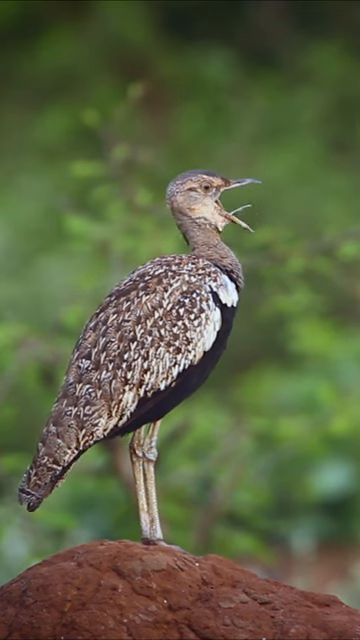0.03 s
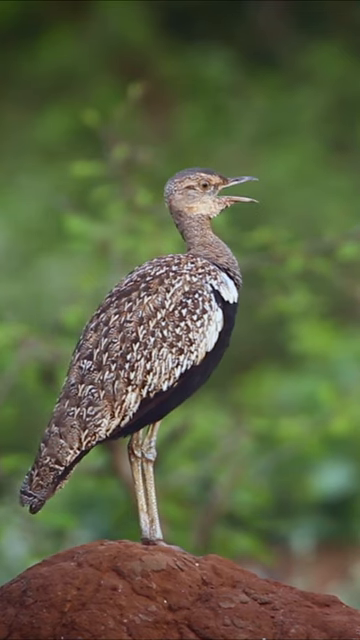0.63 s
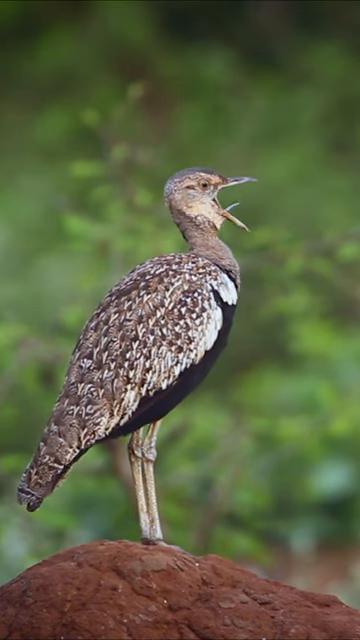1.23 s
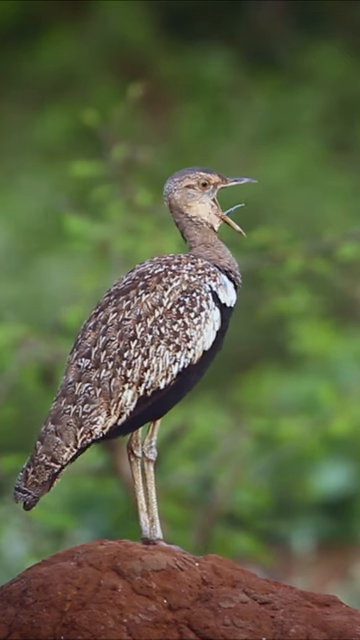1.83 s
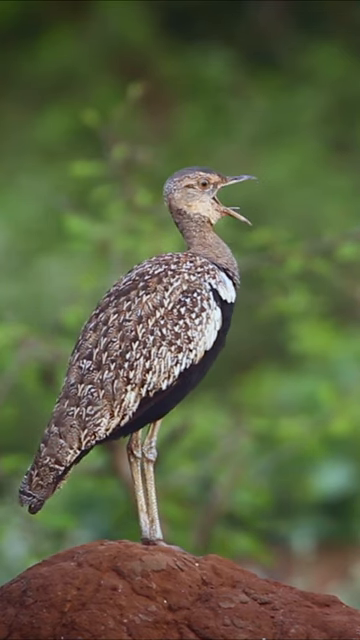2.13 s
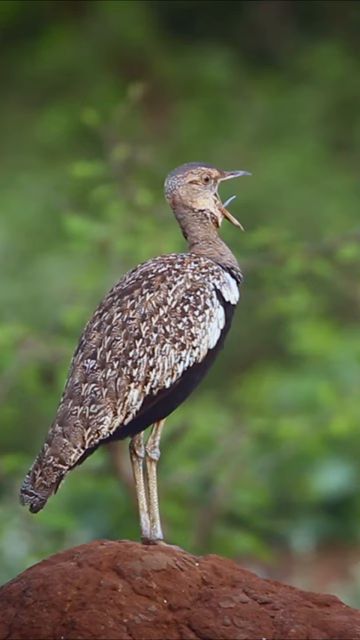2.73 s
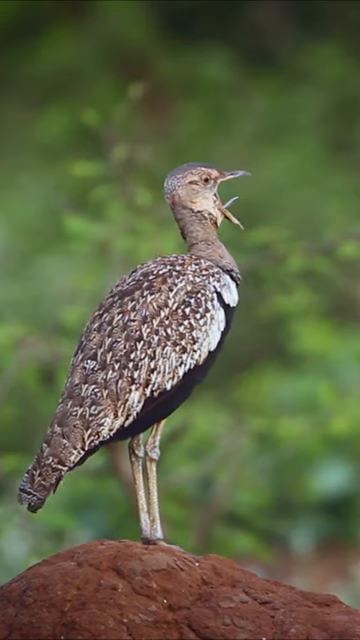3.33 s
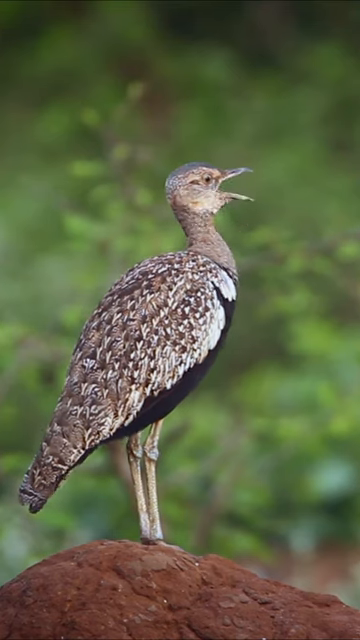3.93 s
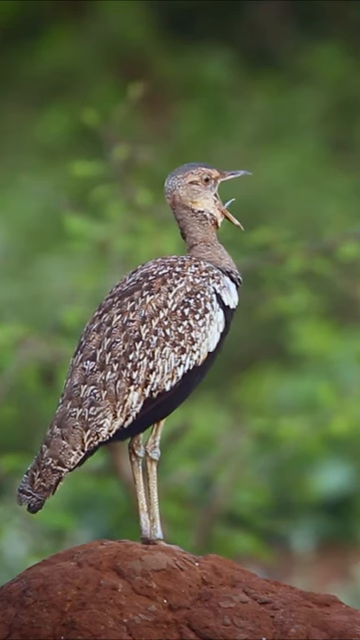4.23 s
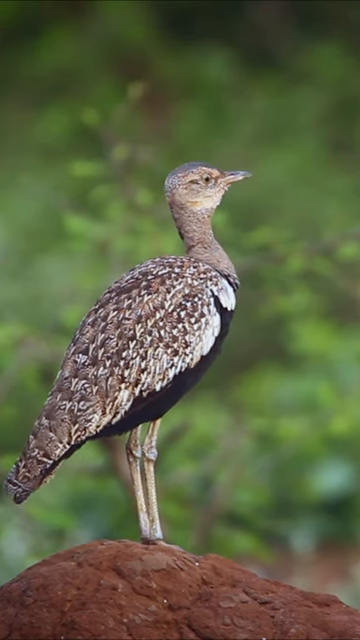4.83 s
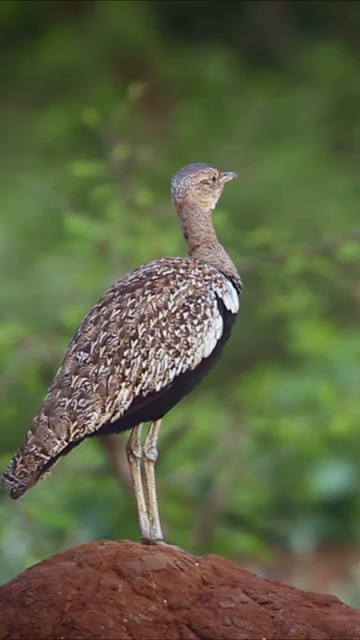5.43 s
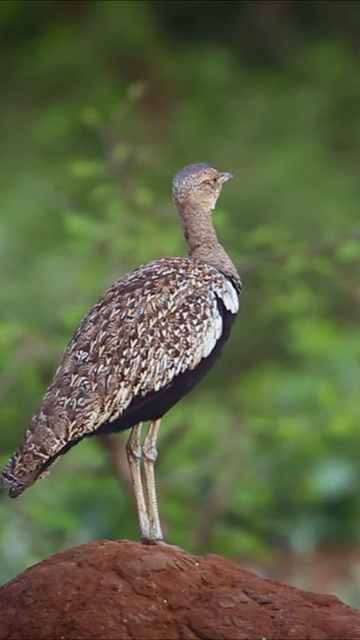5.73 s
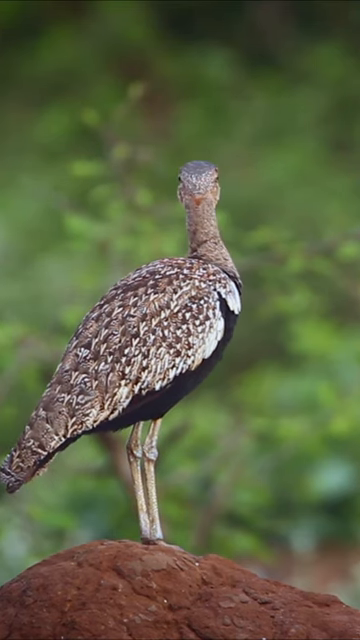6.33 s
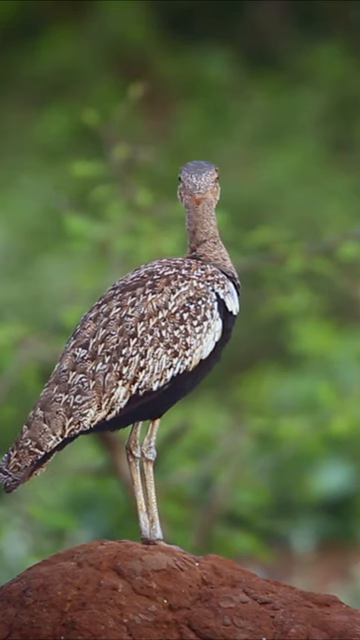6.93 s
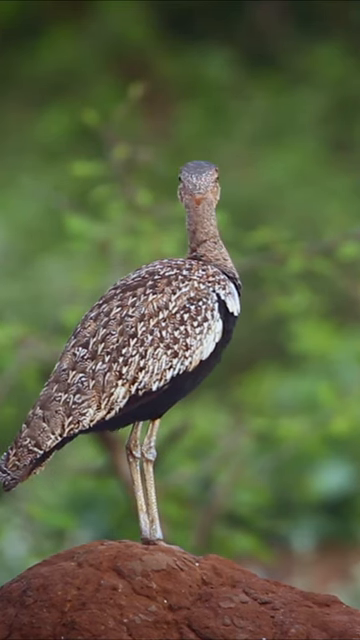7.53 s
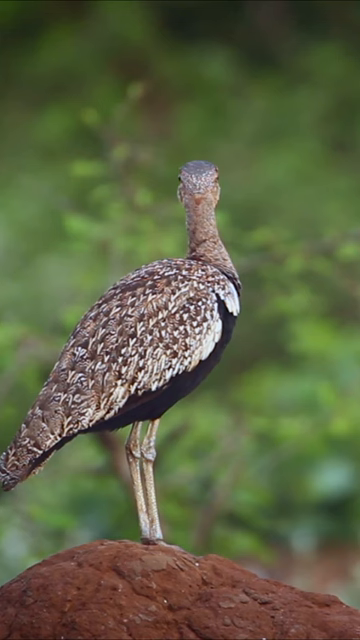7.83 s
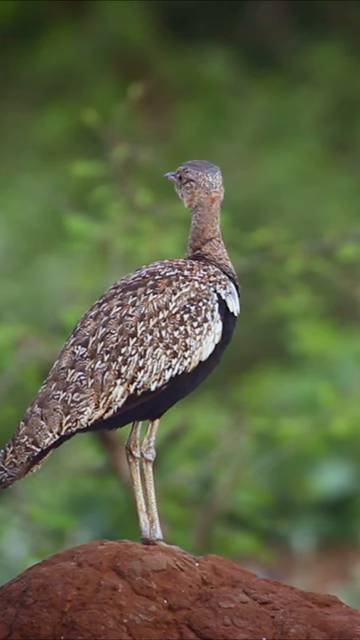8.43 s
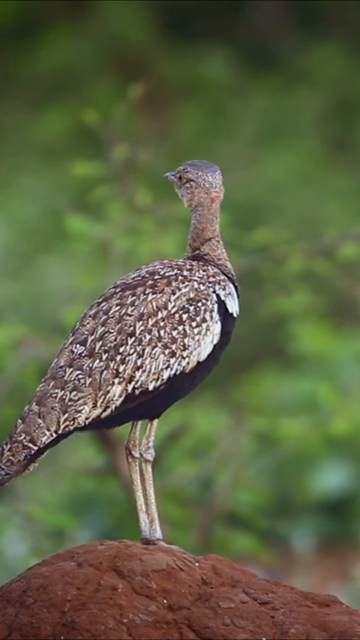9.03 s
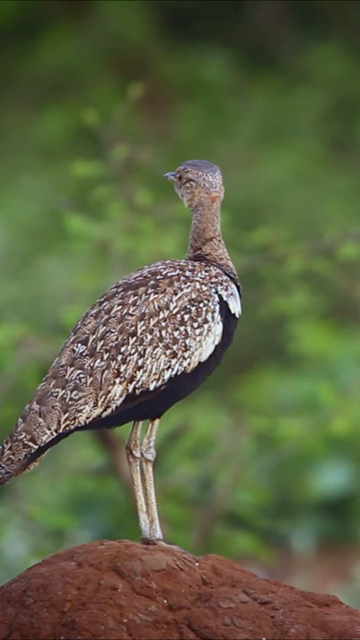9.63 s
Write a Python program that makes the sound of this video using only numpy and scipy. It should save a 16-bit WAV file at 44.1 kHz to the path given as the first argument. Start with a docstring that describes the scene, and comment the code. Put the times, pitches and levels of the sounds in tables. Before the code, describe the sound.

A bird close by gives dry clicks and piercing, downward piping whistles, about two a second, the pipes soon coming in loud and softer pairs. They ring briefly through the scrub and distort the microphone a little. When the run ends, small birds far away carry on with a quick twitter, thin rasps and soft peeps, over faint wind rumble, stirring leaves and hiss.

```python
"""In the bush, a bustard calls from a rock: a dry tongue click rings its mouth cavity, then its syrinx
sounds a loud falling pipe, soon doubled by a shorter one. The pipes scatter back from the scrub and
overload the microphone, which adds gritty overtones. Far off, small birds whistle and chip (gliding
tones) and rasp and squawk (bursts of coloured noise), over a faint breeze and a steady hiss."""
import sys
import numpy as np
from scipy import signal
from scipy.fft import rfft, irfft, next_fast_len
from scipy.io import wavfile
from scipy.ndimage import map_coordinates

SR = 44100
rng = np.random.default_rng(int(sys.argv[2]) if len(sys.argv) > 2 else 0)


def store_pcm(level_fs):
    """Save levels as 16-bit WAV."""
    pcm = np.round(np.clip(level_fs, -1, 1) * 32767).astype(np.int16)
    wavfile.write(sys.argv[1], SR, np.atleast_2d(pcm).T)


N = 426447


def bustard_pipes():
    """Self-sustained oscillation of the syrinx: falling pipes that sink and lengthen through the bout."""
    # Main pipes. Each row: start in seconds, level in dB, closing flick in dB relative to that level.
    pipes = [(.103, -4, -37.5), (.534, -0.73, -34), (0.963, -1.36, -24.5), (1.425, -0.5, -25),
             (1.885, 0.5, -9), (2.341, 0, -13), (2.798, 0, -10), (3.257, -.5, -12), (3.716, -.5, -10),
             (4.184, -.5, -10.5)]
    # Shorter pipes that follow. Each row: start in seconds, level in dB.
    after_pipes = [(1.104, -11), (1.572, -7.5), (2.033, -4.5), (2.493, -6), (2.950, -5), (3.409, -5),
                   (3.873, -5.5), (4.349, -6)]
    # The course of each kind of pipe. Each row: share of its length, pitch ratio, relative level in dB.
    pipe_shape = [(0, 1.165, -6), (.06, 1.12, -3.5), (.14, 1.08, -2), (.32, 1.032, -.7), (.5, 1, -.3),
                  (.72, .968, -3), (.85, .94, -5), (.95, .878, -12.5)]
    after_shape = [(0, 1.13, -27.5), (.2, 1.062, -7.5), (.42, 1.015, 1), (.78, .948, -2), (.97, .892, -11),
                   (1.15, .875, -28)]
    waver, rasp_rad = .004, .025
    out = np.zeros(N)
    for s, db, flick_db in pipes:
        length, hz = .08 + .0116 * s, 2538.2 - 12.8 * s
        hook = np.interp(flick_db, [-28, -12], [.87, 1])  # a stronger flick hooks the pitch higher
        flick = [(1.02, hook, flick_db), (1.07, hook, flick_db - 7.5)]
        pipe = syrinx(pipe_shape + flick, length, hz, waver, rasp_rad * amp(db), overtone=.022)
        pressure = np.minimum(np.arange(len(pipe)) / SR / .04, 1)  # the bird's air builds over 40 ms
        add(out, s, amp(db) * outdoors(pressure * pipe, near_db=-20, far_db=-30.5))
    for s, db in after_pipes:
        length, hz = .042 + .01 * s, 2597 - 35.1 * s
        pipe = syrinx(after_shape, length, hz, waver, 1.9 * rasp_rad * amp(db), overtone=.008)
        add(out, s, amp(db) * outdoors(pipe, near_db=-19.5, far_db=-27.5))
    return out


def syrinx(shape, length, hz, waver, rasp=0, overtone=0):
    """Frequency modulation: a glide, roughened mid-note by phase jitter; a third harmonic as it dies."""
    share, ratio, db = np.transpose(shape)
    u = share[-1] * progress(length * share[-1])
    pitch = hz * np.interp(u, share, ratio) * (1 + waver * wobble(300, len(u)))
    jitter = rasp * np.exp(-((u - .39) / .17) ** 2) * wobble(2200, len(u))
    phase = 2 * np.pi * np.cumsum(pitch) / SR + jitter
    dying = np.exp(-((u - .93) / .06) ** 2)
    envelope = signal.windows.tukey(len(u), .1) * amp(np.interp(u, share, db))
    return envelope * (np.sin(phase) + overtone * dying * np.sin(3 * phase))


def bustard_clicks():
    """Impulse excitation: the tongue snaps free and rings the damped modes of mouth, throat and bill."""
    # One click ahead of each main pipe but the first. Each entry: start in seconds.
    clicks = [.420, .854, 1.333, 1.798, 2.259, 2.718, 3.179, 3.642, 4.113]
    # Throat and bill modes. Each row: frequency in Hz, relative level in dB, 60 dB decay in seconds.
    throat_modes = [(400, -17, .022), (930, -16, .012), (1300, -18, .01), (1850, -16, .012),
                    (3850, -20, .008), (4570, -27, .01), (6050, -28, .008), (7000, -30, .008)]
    mouth_hz, fade_db_per_s = 2560, 2
    out, t = np.zeros(N), progress(.98)[:SR // 16]
    attack, decay = 1 - np.exp(-t / .0004), amp(-60 * t / .012)
    mouth = 1.8 * attack * decay * np.sin(2 * np.pi * mouth_hz * t)
    for s in clicks:
        throat = np.zeros(len(t))
        for hz, db, t60 in throat_modes:
            ring = amp(db + rng.normal(0, 2.017) - 60 * t / t60)
            throat += ring * np.sin(2 * np.pi * hz * rng.normal(1, .033) * t)
        burst = amp(-22) * decay * rng.standard_normal(len(t))
        snap = signal.lfilter([.3], [1, -.7], burst)  # one-pole low-pass
        click = outdoors(mouth + throat + snap, near_db=-19, far_db=-22)
        add(out, s, amp(-14 - fade_db_per_s * s) * click)
    return out


def outdoors(x, near_db, far_db):
    """Reverberation: the direct sound, the quick answer of near bushes and the long one of far trees."""
    bushes = amp(near_db) * scrub(x, t60=.16, delay=.013)
    trees = amp(far_db) * scrub(x, t60=.79, delay=.043)
    return np.pad(x, (0, SR - 1)) + bushes + trees


def scrub(x, t60, delay):
    """Diffuse scattering: leaves and branches return a delayed echo that decays exponentially."""
    t = np.arange(SR) / SR
    tail = rng.standard_normal(SR) * amp(-60 * t / t60) * np.clip(t / delay - 1, 0, 1)
    return signal.fftconvolve(x, tail / np.linalg.norm(tail))


def far_whistlers():
    """Scattering and absorption: small birds echo among trees whose foliage soaks up the treble."""
    twitter = far_twitter()
    direct = amp(2.5) * far_slurs() + twitter
    leaves = amp(-6) * scrub(twitter, t60=.028, delay=.002)[:N]  # these birds sit deep inside a bush
    echo = scrub(direct, t60=.6, delay=.012)[:N]
    trees = filtered(echo, lambda hz: 1 / (1 + (hz / 4500) ** 4))
    return direct + leaves + amp(-10.5) * trees


def far_twitter():
    """Pulse trains of brief syrinx tones: a quickening run of chips, and later a soft, uneven trill."""
    # A V-shaped chip and a rising trill note. Each row: share of length, pitch ratio, level in dB.
    chip_shape = [(0, 1.1, -12), (.16, 1, 2.5), (.34, .75, -18), (.6, .73, -11), (.8, 1, -0.5),
                  (1, 1.28, -17)]
    trill_shape = [(0, 0.73, -4), (.3, 0.89, -5), (.5, 0.995, -7), (.75, 1.17, 3.5), (1, 1.27, -6)]
    first_gap_s, shortest_gap_s, quickening = .096, .035, .545
    out, s = np.zeros(N), 3.998
    for k in range(8):
        db = -28.5 - 1.66 * abs(k - 1)  # the second chip is the loudest
        add(out, s, amp(db) * syrinx(chip_shape, length=.018, hz=4900, waver=.011))
        s += shortest_gap_s + (first_gap_s - shortest_gap_s) * quickening ** k
    for beat in 6.197 + .036 * np.arange(9):
        s, db = rng.normal(beat, .0037), rng.normal(-47, 2)
        add(out, s, amp(db) * syrinx(trill_shape, length=.012, hz=2543, waver=.025))
    return out


def far_slurs():
    """Frequency sweeps: several small birds each slur a nearly pure tone along a contour of their own."""
    # Clear falls, low hoots, drooping whistles and faint, gently arched whistles.
    # Each row: start in seconds, length in seconds, middle pitch in Hz, relative level in dB.
    falls = [(.902, .16, 5840, -59), (1.22, 0.16, 5900, -63.5), (1.543, .15, 5900, -52),
             (1.871, .19, 5700, -52.5), (2.23, 0.17, 5630, -60), (3.179, .13, 4850, -41.5),
             (3.448, .15, 4980, -39.5), (3.719, .16, 5033, -42), (3.85, .17, 5660, -55),
             (5.58, .11, 5300, -58.5), (6.458, 0.16, 5630, -57), (9.018, .12, 4560, -48)]
    hoots = [(.872, .07, 1020, -49.5), (1.18, .085, 1000, -48), (1.863, .13, 860, -46.5),
             (2.9, .14, 845, -51.5)]
    droops = [(8.084, 0.23, 1974, -59), (8.808, 0.34, 2120, -62), (8.954, 0.037, 3030, -42.5),
              (9.193, .044, 3340, -56), (9.34, 0.076, 1670, -54.5)]
    arched_whistles = [(2.467, .13, 3990, -53.5), (7.791, 0.066, 2080, -59), (9.56, 0.095, 1588, -57)]
    # Arched peeps. Each row: start in seconds, middle pitch in Hz, relative level in dB.
    peeps = [(6.902, 2825, -51), (7.1, 2875, -49), (7.307, 2780, -46), (9.325, 2935, -44),
             (9.518, 2820, -45.5)]
    # Soft phrases, a fall and then an up-slur. Each row: start and length of the fall in seconds.
    phrases = [(7.633, 0.098), (8.0, 0.091), (8.328, .105)]
    # Thin, broken notes near one pitch. Each row: start and length in seconds.
    chatter = [(4.575, .11), (5.26, 0.12), (6.65, .07)]
    # Each glide: start pitch and end pitch as ratios to the middle pitch.
    fall, hoot, droop, shallow_arch = (1.14, .77), (1.3, .98), (1.02, .88), (.94, .95)
    arch, upslur, flat = (.92, .94), (.75, 1.39), (.97, .94)
    faint_falls_per_s = 1.5
    out = np.zeros(N)
    for notes, glide in (falls, fall), (hoots, hoot), (droops, droop), (arched_whistles, shallow_arch):
        for s, length, hz, db in notes:
            add(out, s, amp(db) * whistle(length, hz, glide))
    for s, hz, db in peeps:
        add(out, s - .036, amp(db - 5) * whistle(length=.02, hz=4240, glide=upslur))  # quick lead-in
        add(out, s, amp(db) * whistle(length=.11, hz=hz, glide=arch))
    for s, length in phrases:
        add(out, s, amp(-56.5) * whistle(length, hz=3900, glide=fall))
        add(out, s + length, amp(-56.5) * whistle(length=.039, hz=3480, glide=upslur))
    for s, length in chatter:
        add(out, s, amp(-56) * whistle(length, hz=4535, glide=flat, flutter_db=7.5))
    for when, height in rng.random((int(faint_falls_per_s * N / SR), 2)):  # birds farther off
        hz = 4360 * 2 ** ((height - .5) * 1.4)  # spread over 1.4 octaves
        add(out, when * N / SR, amp(-64) * whistle(length=.15, hz=hz, glide=fall))
    return out


def whistle(length, hz, glide, flutter_db=2.5):
    """Frequency and amplitude modulation: a wavering, fluttering tone on a parabolic glide."""
    u = progress(length)
    parabola = np.polyfit([0, .5, 1], [glide[0], 1, glide[1]], 2)
    waver_hz = 27 * wobble(200, len(u))
    pitch = hz * np.polyval(parabola, u) + waver_hz
    swell = signal.windows.tukey(len(u), .35) * amp(flutter_db * wobble(70, len(u)))
    return swell * np.sin(2 * np.pi * np.cumsum(pitch) / SR)


def far_raspers():
    """Formants: spectral peaks set thin, high rasps apart from lower, harsh squawks."""
    # The calls. Each row: start in seconds, length in seconds, relative closing level in dB.
    rasp_calls = [(4.73, .24, -50), (5.1, .2, -50.5), (5.43, 0.17, -52.5), (5.69, 0.15, -51.5),
                  (5.92, .12, -50.5), (7.6, .05, -58.5), (7.84, 0.039, -55), (8.05, 0.045, -48.5),
                  (8.37, .05, -54.5), (8.71, 0.051, -55)]
    squawk_calls = [(.87, 0.1, -48), (1.19, 0.134, -46), (1.5, .15, -49.5), (1.73, 0.13, -50.5),
                    (2.17, 0.091, -47)]
    # Their spectra. Each row: frequency in Hz, relative level in dB.
    rasp_colour = [(2500, -17), (3700, -8), (4500, 4.5), (5100, -10), (5800, -1.5), (6300, -1), (7100, -1),
                   (8200, -17), (10500, -31)]
    squawk_colour = [(600, -32), (1150, 5), (1400, -6), (1650, -8.5), (2000, -5), (3400, 2.5), (4200, -24),
                     (7000, -35.5)]
    rasps = harsh_calls(rasp_calls, rasp_colour, rough_db=1, fade_db=7)
    squawks = harsh_calls(squawk_calls, squawk_colour, rough_db=3, fade_db=5)
    return amp(-6.5) * rasps + amp(-1.5) * squawks


def harsh_calls(calls, colour, rough_db, fade_db):
    """Amplitude-modulated noise: toneless, fluttering calls start quickly and fade into their echo."""
    envelope = np.zeros(N)
    for s, length, db in calls:
        u = progress(length)
        course_db = db + fade_db * (1 - u) + rough_db * wobble(200, len(u))
        add(envelope, s, signal.windows.tukey(len(u), .4) * amp(course_db))
    noise = filtered(rng.standard_normal(N), lambda hz: amp(along(colour, hz)))
    voice = envelope * unit(noise)
    return voice + amp(-11.5) * scrub(voice, t60=.18, delay=.012)[:N]


def breeze():
    """Flow noise: a light breeze rumbles on the microphone and stirs the foliage, over steady hiss."""
    # Puffs at the microphone. Each row: peak time in seconds, level over the steady rumble in dB.
    gusts = [(.56, 12), (2.2, 3.5), (3.2, 1.5), (4.9, 3), (9.7, 5)]
    # The stirring of the foliage. Each row: time in seconds, relative level in dB.
    stirring = [(0, -53), (.52, -52.5), (2.2, -51), (4.3, -53.5), (4.9, -51), (7.2, -53), (8.2, -54.5),
                (9.67, -53)]
    # Spectra of the three noises. Each row: frequency in Hz, relative level in dB.
    rumble_colour = [(12, -21), (25, -5.5), (45, -1.5), (100, -2.5), (200, -10), (400, -27), (800, -57.5)]
    foliage_colour = [(100, -5), (250, 1.5), (500, -0.5), (1000, -2.5), (2000, -7.5), (4000, -9),
                      (8000, -21.5), (16000, -41.5)]
    hiss_colour = [(500, -16), (3000, -5.5), (6000, -2.5), (10000, -2), (16000, -3.5)]
    t, gust_width_s = np.arange(N) / SR, .34
    gust_db = sum(db * np.exp(-((t - s) / gust_width_s) ** 2) for s, db in gusts)
    rumble = amp(-54.7 + gust_db + .91 * wobble(17, N)) * air(rumble_colour)
    foliage_db = np.interp(t, *np.transpose(stirring)) + 2 + .23 * wobble(5, N)
    foliage = amp(foliage_db) * air(foliage_colour)
    return rumble + foliage + amp(-54) * air(hiss_colour)


def air(colour):
    """Partial coherence: coloured stereo noise of rms 1, largely alike in both channels."""
    # Likeness of left and right. Each row: frequency in Hz, correlation from 0 to 1.
    coherence = [(60, 0.7), (150, 1), (350, 0.96), (1600, 1), (5000, 0.96), (15000, 0.59)]

    def mid_side_gains(hz):
        turn = np.arccos(np.clip(along(coherence, hz), -1, 1)) / 2
        return amp(along(colour, hz)) * [np.cos(turn), np.sin(turn)]

    mid, side = filtered(rng.standard_normal((2, N)), mid_side_gains)
    return unit(np.array([mid + side, mid - side]))


def amp(db):
    """Decibels to amplitude ratio."""
    return 10 ** (np.asarray(db) / 20)


def unit(x):
    """Normalisation to rms 1."""
    return x / np.sqrt(np.mean(x ** 2) + 1e-20)


def along(points, hz):
    """Interpolation of (Hz, value) points on a logarithmic frequency axis."""
    knots_hz, values = np.transpose(points)
    return np.interp(np.log(hz + 1), np.log(knots_hz + 1), values)


def wobble(rate, size):
    """Spline interpolation: a smooth random curve with rate knots a second."""
    knots = rng.standard_normal(int(size * rate / SR) + 4)
    return map_coordinates(knots, [np.arange(size) * rate / SR])


def filtered(x, response):
    """Linear filtering: the spectrum of x times a frequency response."""
    size = next_fast_len(N + SR // 2)
    hz = np.fft.rfftfreq(size, 1 / SR)
    return irfft(rfft(x, size) * response(hz), size)[..., :N]


def add(track, s, sound):
    """Superposition of a sound on a track at s seconds."""
    start = max(round(s * SR), 0)
    part = track[start:start + len(sound)]
    part += sound[:len(part)]


def progress(length):
    """Normalised time: 0 to 1 over length seconds."""
    return np.linspace(0, 1, max(int(length * SR), 16))


def scene():
    """Superposition: all the birds sound from the middle, over the stereo breeze."""
    return bustard_pipes() + bustard_clicks() + far_whistlers() + far_raspers() + breeze()


def record(dry):
    """Harmonic distortion: overload flattens the loudest pipes into gritty overtones; then a low-pass."""
    ceiling, top_hz = amp(-5), 15900
    bias = np.array([[.04], [-.03]])  # opposite lopsidedness in each channel spreads even overtones wide
    sampled = signal.resample_poly(dry, 160, 147, axis=1)  # to 48 kHz, where the top overtones alias
    flattened = np.clip(sampled + bias, -ceiling, ceiling) - bias
    distorted = signal.resample_poly(flattened, 147, 160, axis=1)
    return filtered(distorted, lambda hz: hz < top_hz)


dry = scene()
out = record(dry)
store_pcm(out)
```